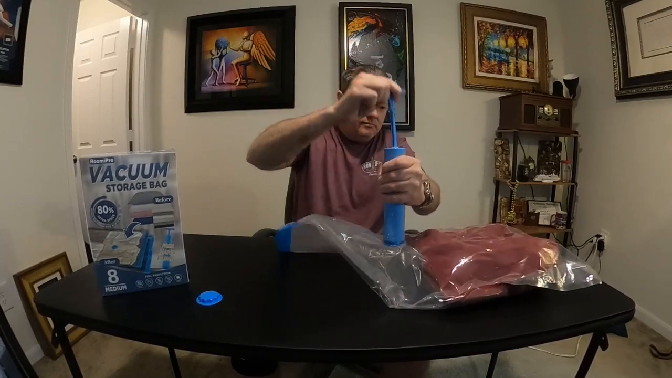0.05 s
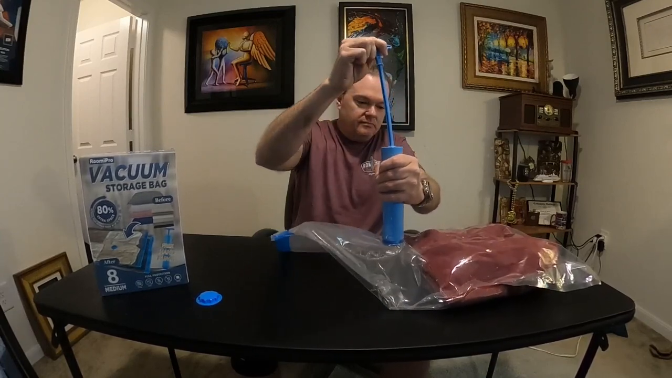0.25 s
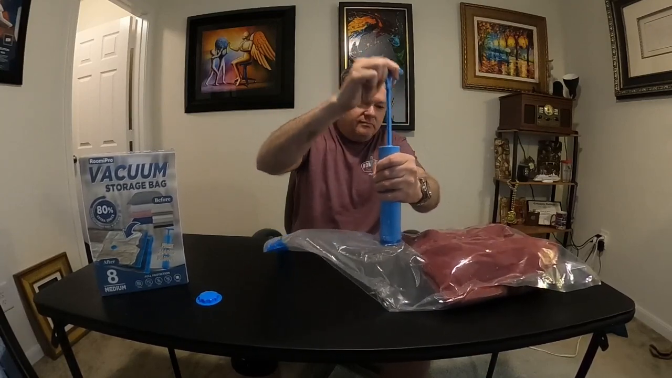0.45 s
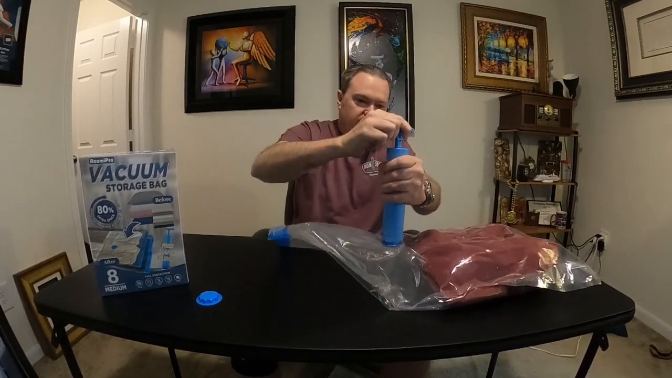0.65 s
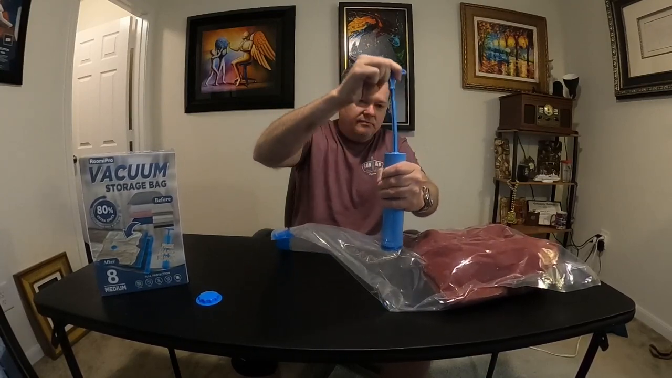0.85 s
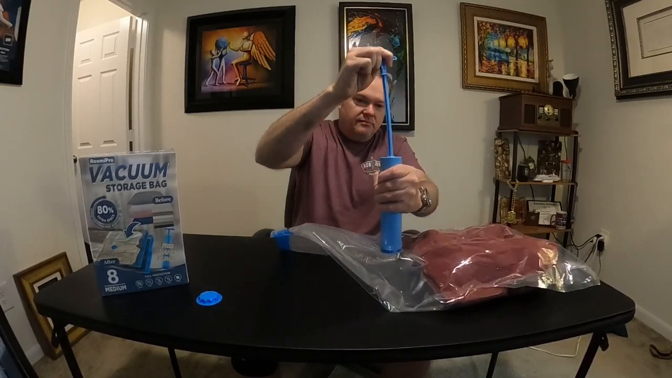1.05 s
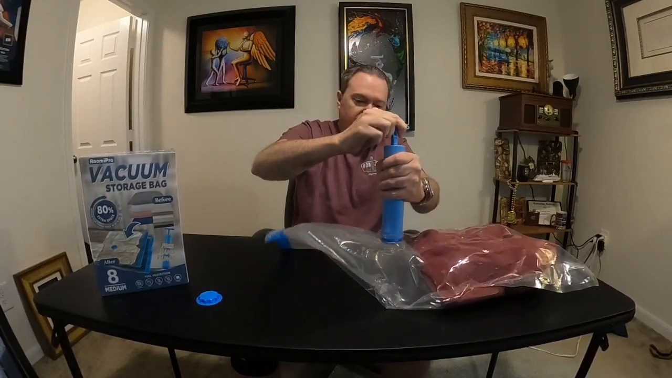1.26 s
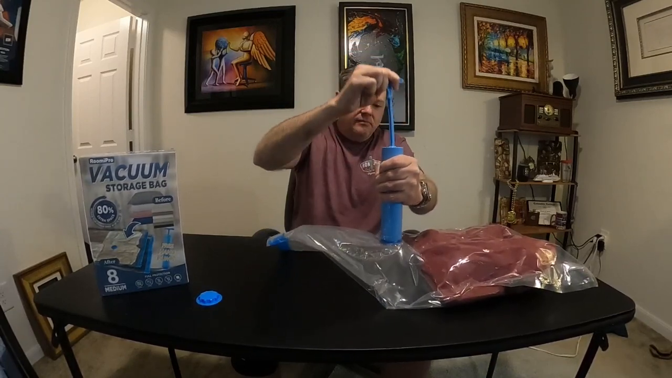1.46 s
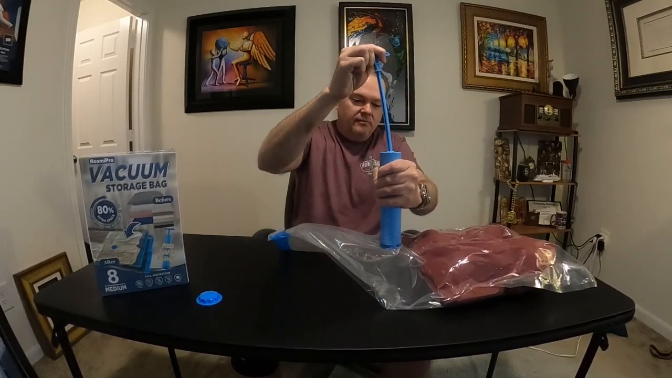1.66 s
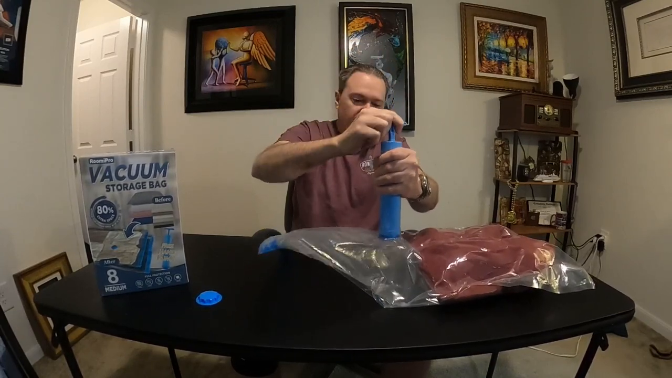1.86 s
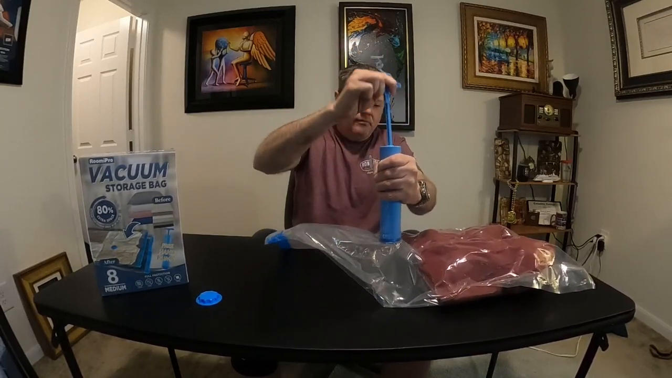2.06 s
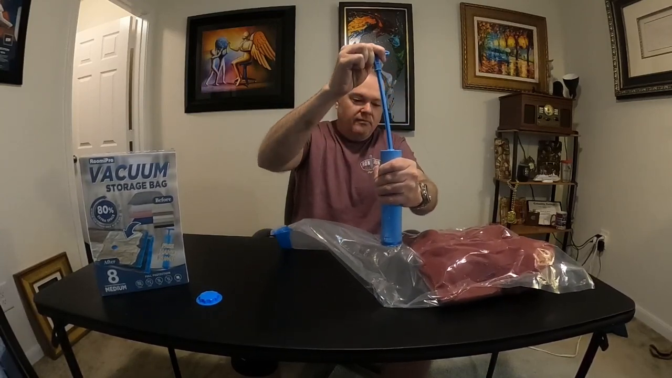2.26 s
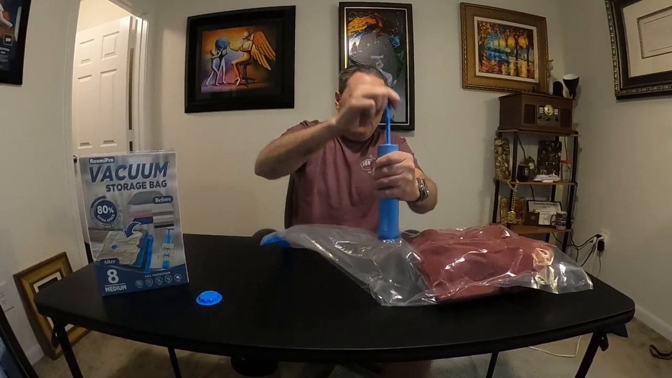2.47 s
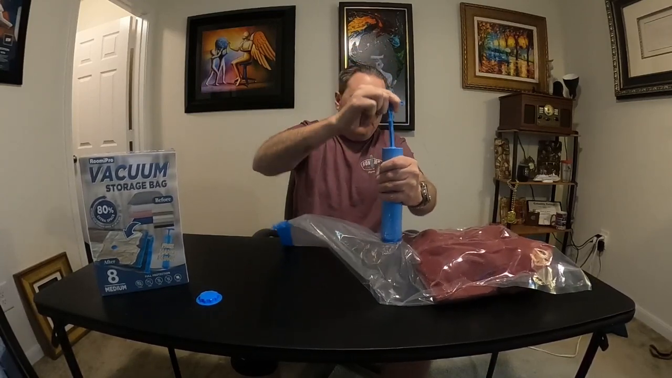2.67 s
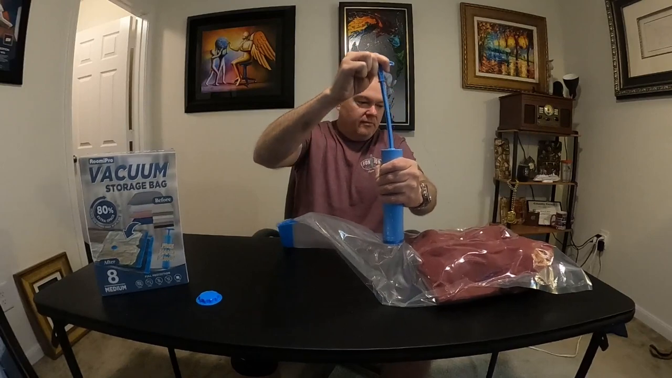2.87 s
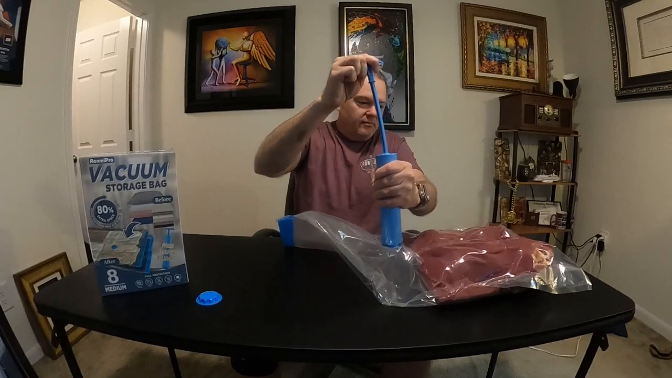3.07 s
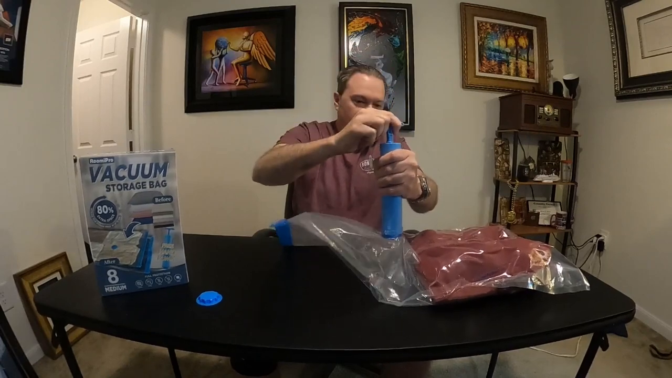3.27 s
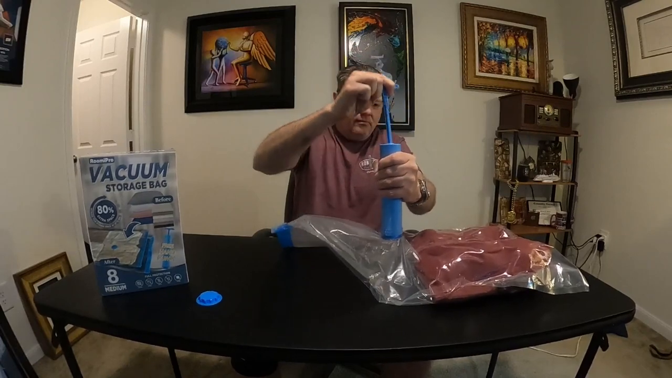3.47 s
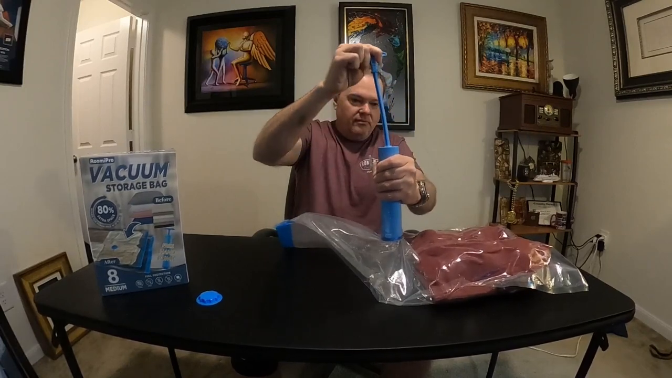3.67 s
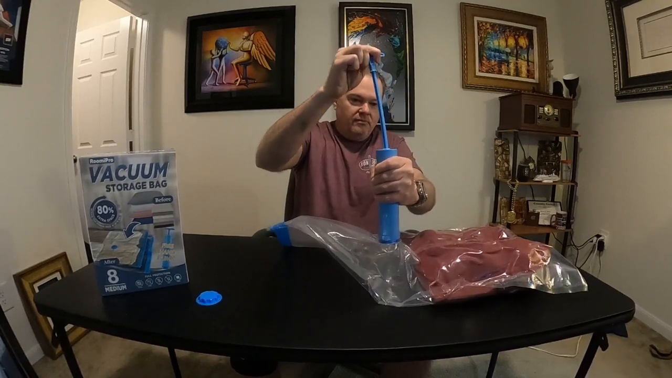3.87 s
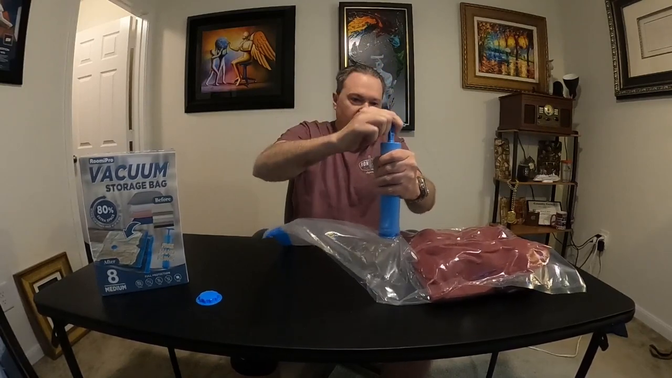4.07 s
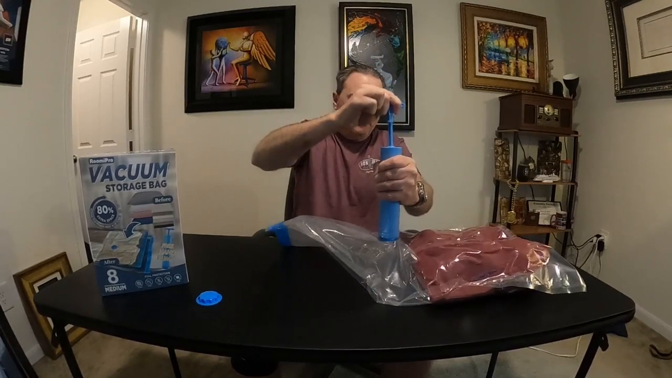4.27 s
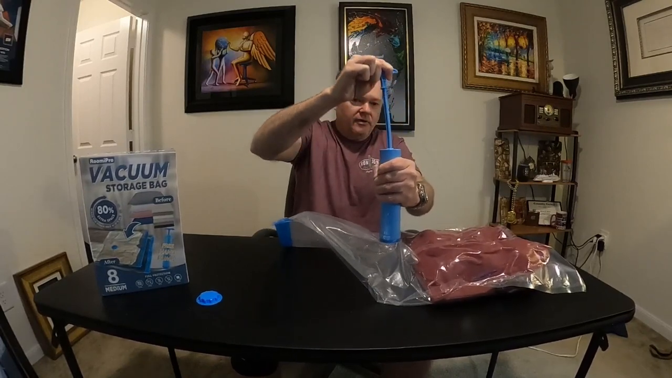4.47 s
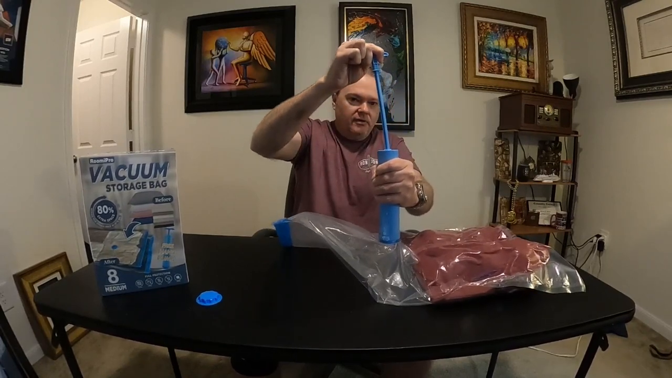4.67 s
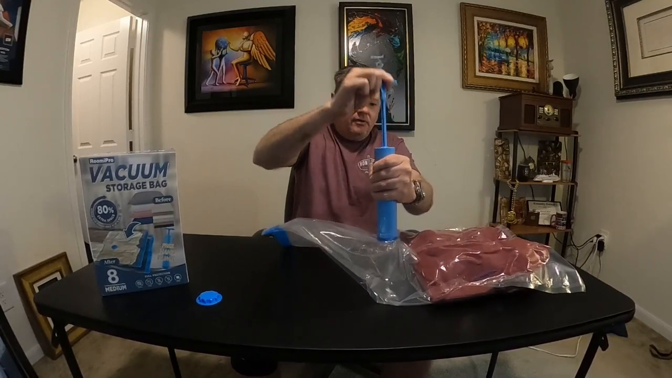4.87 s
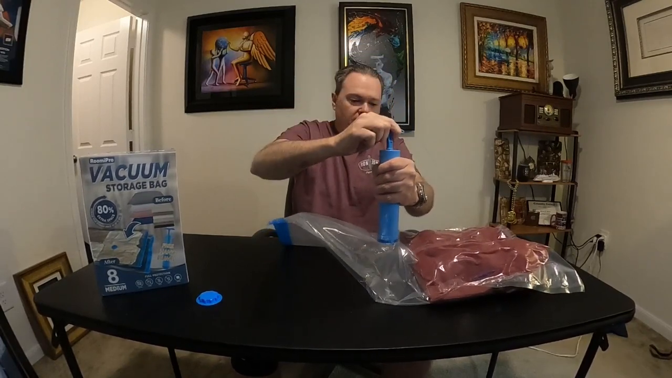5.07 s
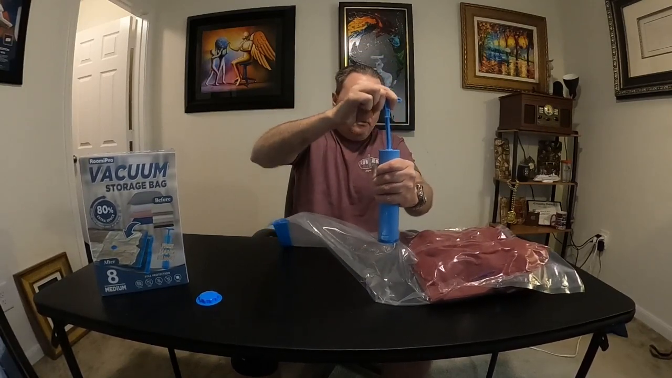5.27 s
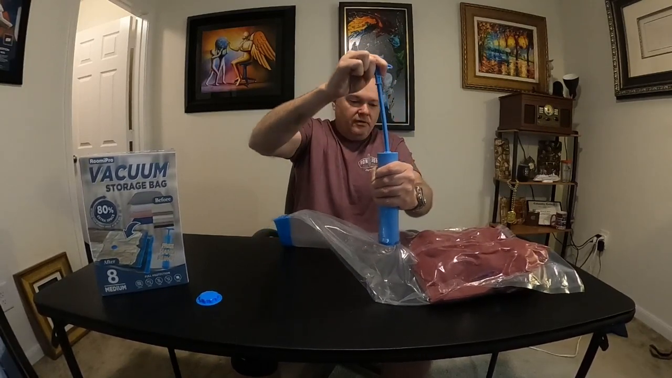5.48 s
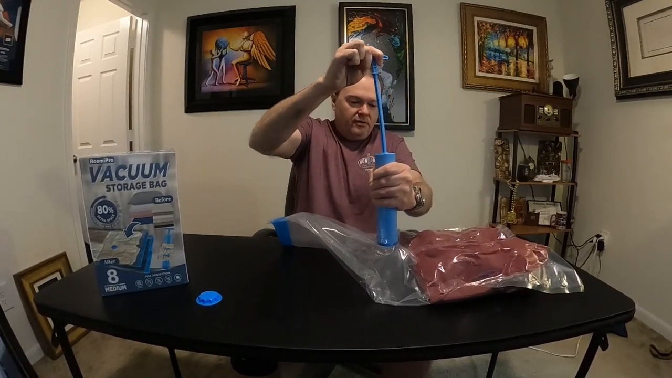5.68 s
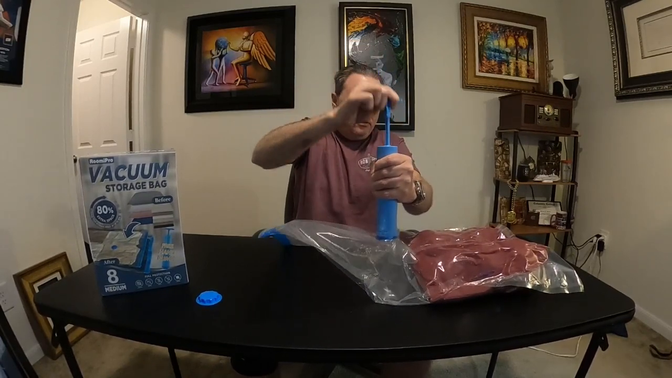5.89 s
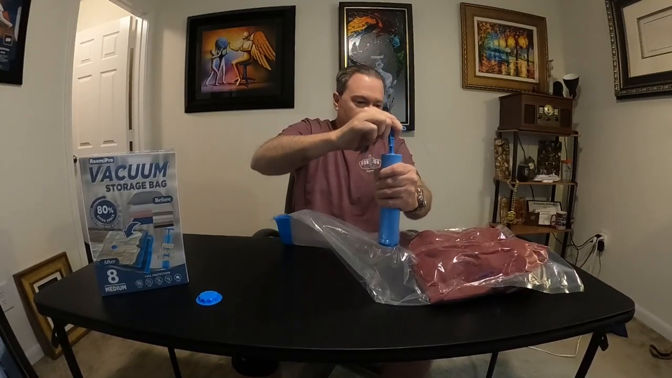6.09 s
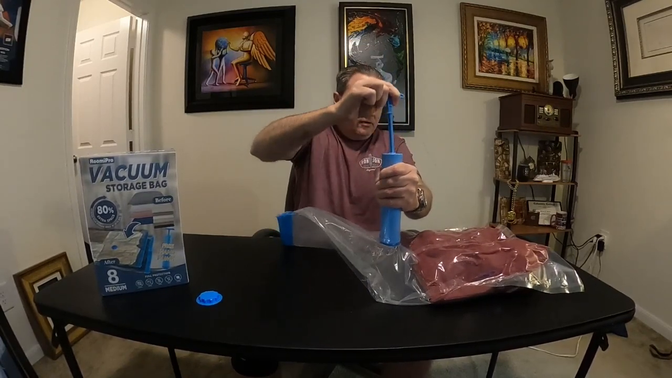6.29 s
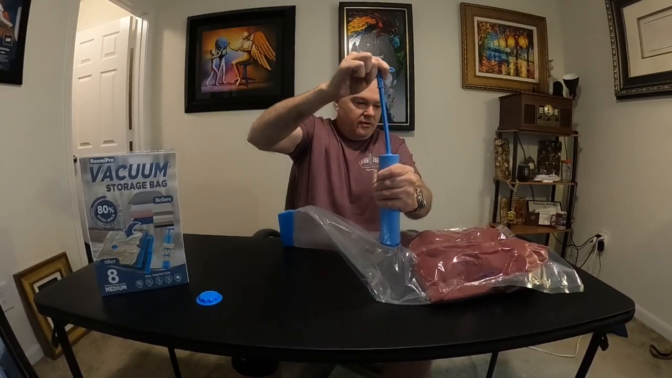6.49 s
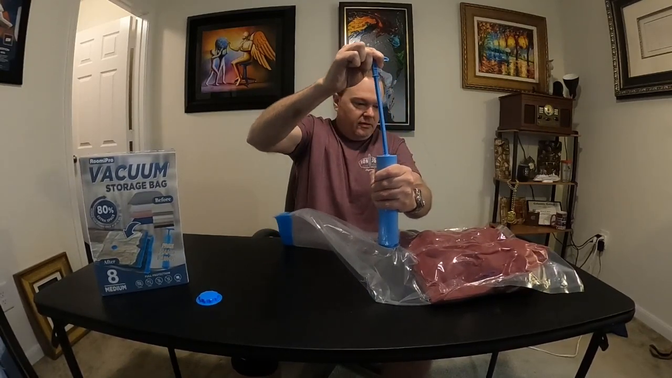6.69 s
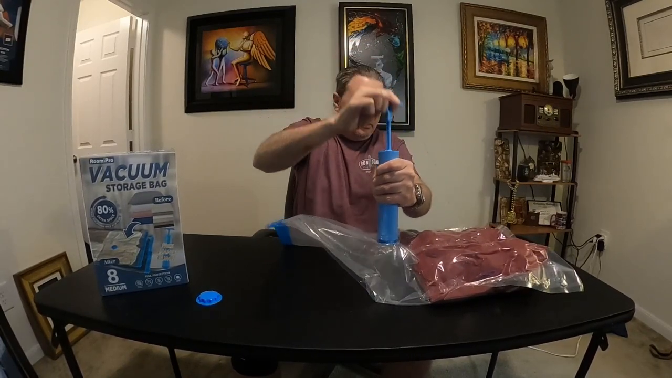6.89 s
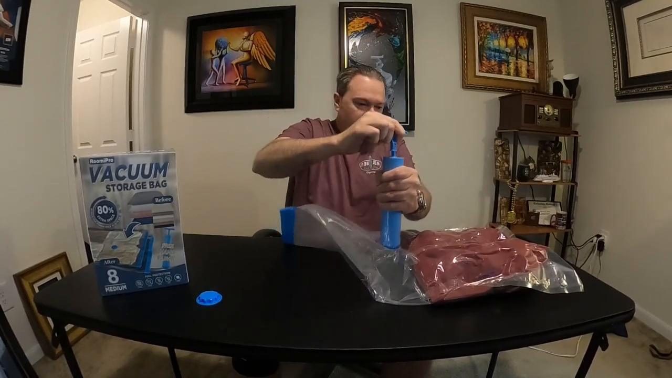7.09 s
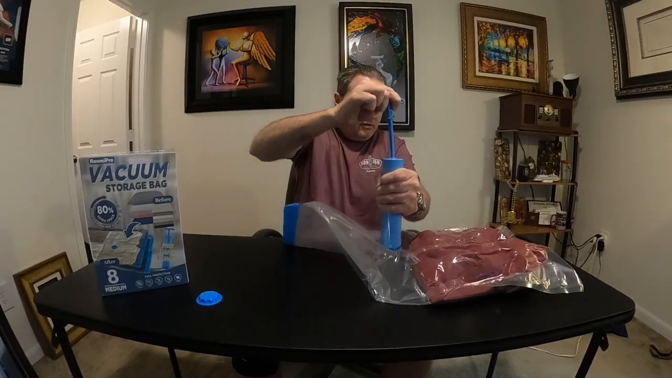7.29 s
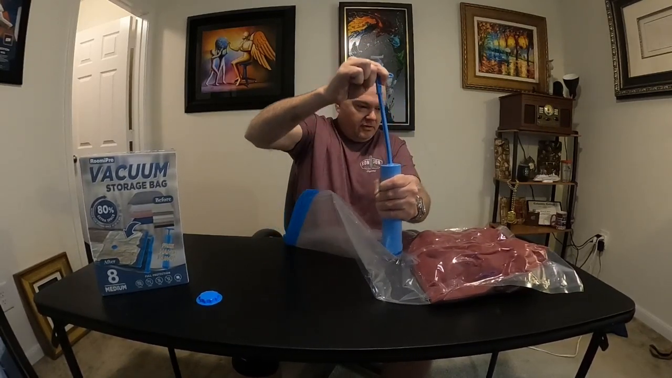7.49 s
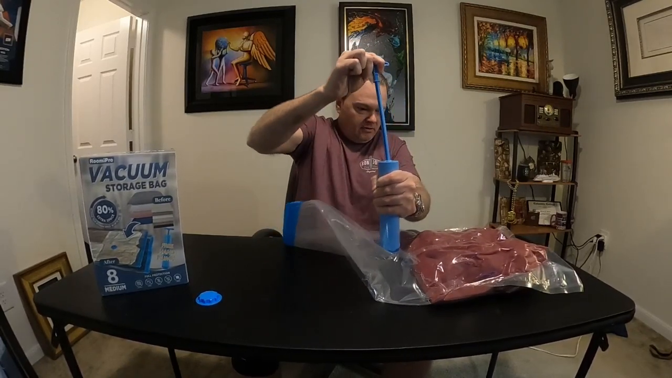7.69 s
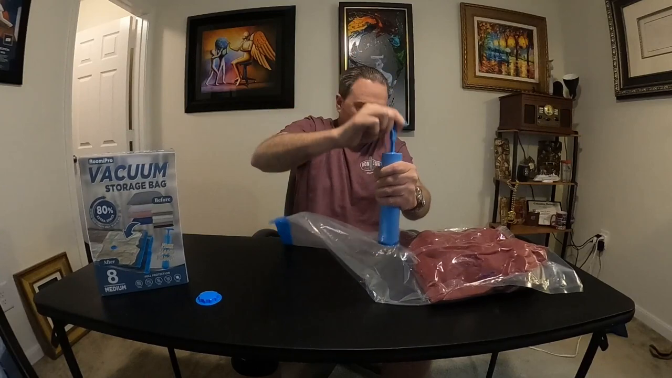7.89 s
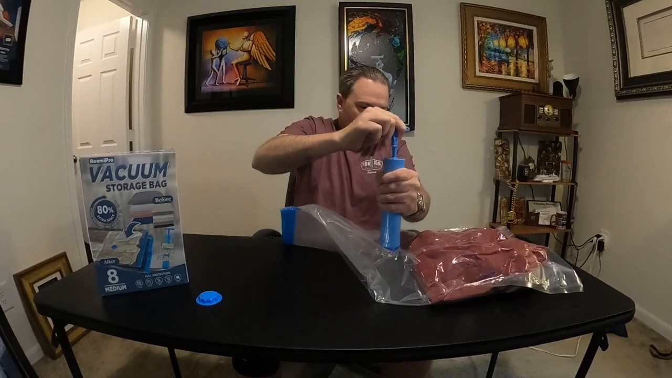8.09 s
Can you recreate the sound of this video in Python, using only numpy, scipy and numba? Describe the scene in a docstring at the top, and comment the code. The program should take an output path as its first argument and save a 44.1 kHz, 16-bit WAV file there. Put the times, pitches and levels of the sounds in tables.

```python
"""A whoosh breaking off in a knock comes first, over a low drone: a plastic hand pump empties a storage bag on
a table in a small, bare room. Pushes drive noise through a lengthening tube and end in impulsive knocks; pulls
hiss through the bag's valve as filtered noise, most ending in a hollow resonant plock. Filtered clicks make the
snaps of rod, film and valve, the creasing and some soft low thumps. Echoes and a dense decaying tail form the
room; a low, uneven sine sways the table."""
import sys
import numpy as np
from scipy import signal
from scipy.fft import rfft, irfft, next_fast_len
from scipy.io import wavfile
from numba import njit

SR = 44100
rng = np.random.default_rng(int(sys.argv[2]) if len(sys.argv) > 2 else 0)


def int16_out(signal):
    """Quantize to a 16-bit WAV file."""
    q = np.round(np.clip(np.atleast_2d(signal).T, -1, 1) * 32767)
    wavfile.write(sys.argv[1], SR, q.astype(np.int16))


N = 358974

# All levels in these tables are relative to one another; some sources also add an overall level.
# the piston goes down until its knock: start_s, rise_s (time to nearly full speed), level_db
PUSH_STROKES = [(-0.07, 0.051, -30), (0.51, 0.063, -34), (1.19, 0.077, -30), (1.82, 0.098, -27.5),
                (2.48, 0.094, -29), (3.184, 0.062, -29), (4.025, 0.039, -30.5), (4.915, 0.064, -31),
                (5.915, 0.057, -32), (6.9, 0.085, -30.5), (7.875, 0.09, -31)]
# the piston goes up: start_s, length_s, level_db, sag_db (loss of level by the end)
PULL_STROKES = [(0.101, 0.19, -33, 1), (0.811, 0.26, -29, 6), (1.471, 0.22, -32.5, 2),
                (2.083, 0.23, -32.5, 5), (2.704, .35, -36.5, 2), (3.46, 0.38, -35, 7),
                (4.277, 0.5, -39.5, 1.5), (5.203, .57, -39, 0.7), (6.188, 0.62, -37, 3.5),
                (7.184, 0.59, -36.5, 3)]
# the piston hits the bottom and presses the pump into the film:
# time_s, energy_db, tilt_db_per_octave, crease_db (level of the creasing)
BOTTOM_KNOCKS = [(0.0522, 6.5, 0, -41), (0.6898, 5, 2.5, -41), (1.3393, 5, -4.5, -37.5),
                 (1.97, 7, -1.7, -39.5), (2.64, 4, -2.5, -37.5), (3.323, 3.5, -8, -37),
                 (4.1818, 4, 3.5, -44.5), (5.0984, 2, 3.5, -40), (6.0727, 5, 0.5, -38.5),
                 (7.0719, 4.5, 0, -41.5), (8.0397, 3.5, 1, -40)]
# the piston reaches the top and the barrel's air rings: time_s, energy_db, pitch_hz
TOP_PLOCKS = [(0.3245, -0.5, 1614), (1.0641, -4, 1680), (1.742, -6, 1520), (2.3616, -7, 1630),
              (3.83, -3, 1680), (4.744, -17, 1660), (5.7018, -7, 1670), (6.7307, -9, 1650),
              (7.6851, -7.5, 1700)]
# snaps of the rod and the film, and of the valve opening as some pulls begin: # time_s, energy_db, ring_hz,
# tilt_db_per_octave
PLASTIC_SNAPS = [(0.391, -12, 2210, -7.5), (0.5612, -12, 3020, -5), (1.1577, -6.5, 1830, -2),
                 (1.4958, -6, 4000, -2), (1.8555, -8, 4000, 0), (2.0998, -6, 4000, -1),
                 (2.4671, -10, 1860, -5.5), (2.5749, -5.5, 2580, -9), (2.606, -6.5, 1397, -1),
                 (3.271, -2, 4670, -4), (3.2799, -5.5, 780, -0.5), (3.4859, -0.3, 2140, 0.5),
                 (3.9566, -8.5, 2000, 2), (4.409, -12.5, 700, 2), (4.605, -12, 1556, 1.5),
                 (4.846, -15.5, 1330, 0), (5.043, -6, 970, -3), (5.4272, -4, 1440, 1),
                 (5.8351, -7, 2570, -3), (5.8646, -10, 860, -18), (5.9776, -3.5, 2980, 6),
                 (6.162, -6.5, 920, 1), (6.3073, -3.5, 1960, 1.5), (6.554, 0.5, 3940, -8),
                 (7.172, -1.5, 5460, -5.5), (7.5256, -7.0, 3400, -3), (7.797, -10.5, 1360, -7),
                 (7.8389, -6, 1870, 0), (8.1284, -5.5, 1010, -1.5)]
# low, soft thumps: time_s, energy_db
LOW_THUMPS = [(0.099, -11), (0.712, -16), (0.796, -14), (1.452, -11), (2.694, -5.5), (3.161, -20),
              (3.456, -6), (3.601, -14), (4.891, -15), (5.807, -15.5), (6.162, -8.5), (7.189, -10.5)]
# the film creases as the pump leans over: time_s, level_db, spread_s (standard deviation)
FILM_CREASES = [(1.172, -40, .015), (2.421, -45.5, 0.053), (3.146, -42, 0.033), (3.553, -46, 0.085),
                (3.983, -39, 0.032), (4.885, -42.5, 0.019), (5.19, -45, .035), (5.706, -46.5, 0.021),
                (5.885, -43.5, 0.028), (6.888, -49, 0.018), (7.508, -49.5, .04)]
# the table sways under the weight of a push: time_s, level_db
TABLE_SWAYS = [(3.3, -51), (5.21, -45.5), (6.18, -46)]
# how tight the bag is, which sharpens the hiss: time_s, tightness (share 0-1)
BAG_TIGHTNESS = [(0, 0.08), (2.5, 0.2), (4.5, 1), (8.1, 0.98)]
# spectrum of the valve's hiss on a slack bag: frequency_hz, level_db
SLACK_HISS_SPECTRUM = [(150, -59), (500, -33), (1000, -9), (1800, -5), (2700, 0), (3500, 0.5), (4900, 3),
                       (6400, -1.5), (7700, -3), (8700, -19), (10000, -21), (11200, -36), (12300, -30),
                       (15000, -50)]
# spectrum of the valve's hiss on a tight bag: frequency_hz, level_db
TIGHT_HISS_SPECTRUM = [(150, -49), (500, -31), (1100, -53), (2000, -4.5), (2800, -7), (3600, -0.5),
                       (4900, 1.5), (6300, -2.5), (7700, -0.5), (8700, -14.5), (10100, -14), (11200, -23.5),
                       (12300, -20), (15000, -34)]
# spectrum of air rushing into the barrel: frequency_hz, level_db
WHOOSH_SPECTRUM = [(120, -32.5), (300, -14), (750, 1), (1100, -9.5), (1550, -5), (2700, -3.5), (3900, 1),
                   (4600, 5.5), (5800, 2.5), (6400, -5.5), (7700, -7), (8700, -24.5), (12300, -34),
                   (15000, -48)]
# spectrum of plastic touching plastic: frequency_hz, level_db
CONTACT_SPECTRUM = [(150, -47.5), (700, -0.5), (1400, -3.5), (5000, -2.5), (7700, -3), (8700, -20),
                    (11000, -32), (15000, -43)]
# spectrum of a knock's crack straight ahead: frequency_hz, level_db
CRACK_SPECTRUM = [(150, -47), (700, -27), (1100, -10.5), (1520, 6), (1850, -4.5), (2200, 3.5), (2800, -5),
                  (3500, 4), (4400, -4.5), (5300, 1.5), (6200, -4.5), (7300, 4), (8700, -17), (15000, -84)]
# spectrum of a dull blow: frequency_hz, level_db
THUD_SPECTRUM = [(40, -36), (150, -1.5), (280, 2), (440, -2), (700, -7.5), (1400, -32.5), (4000, -75)]
# spectrum of the rubbing and creasing film: frequency_hz, level_db
FILM_SPECTRUM = [(60, -18), (170, -0.5), (400, 0), (600, 2), (800, 3.5), (1150, -1), (1600, 2.5),
                 (2800, -7.5), (7500, -17), (10000, -39)]
# spectrum of the house's drone: frequency_hz, level_db
DRONE_SPECTRUM = [(20, -1.5), (45, 0), (65, 3), (82, -0.5), (105, -7), (170, -0.5), (300, -21.5),
                  (550, -31), (1500, -7.5), (7000, -33), (10000, -37), (15000, -73)]
# colour the walls give the room tail: frequency_hz, level_db
WALL_COLOUR = [(60, -2.5), (200, 2.5), (700, -7), (1100, -1), (1700, -4), (2700, -3), (3600, -0.5),
               (5000, -3), (7500, 1.5), (14000, 4)]
# left-right difference of the room tail: frequency_hz, side_db
TAIL_WIDTH = [(100, -20), (500, -12.5), (1100, -14.5), (2200, -9.5), (4500, -9.5), (8000, -10),
              (14000, 3.5)]
# decay of the room: frequency_hz, t60_s
ROOM_DECAY = [(150, 0.39), (600, 0.29), (1700, 0.38), (3600, 0.5), (8000, 0.35), (14000, 0.049)]
# first reflections: delay_s, gain
WALL_ECHOES = [(.0027, 0.14), (.0072, 0.045), (0.0107, 0.093), (0.0124, 0.081), (0.019, 0.065)]

EDGE_HZ = 15300  # upper edge of the sound's band
TAPS = 2048  # length of a click in samples
LEAD_S = .004  # from the start of a contact cluster to its centre
HZ = np.fft.rfftfreq(TAPS, 1 / SR)
TIME = np.arange(N) / SR
# a push eases off as the chamber fills: sag in dB per second of stroke left after the rise;
# its air dies away after the knock
PUSH_SAG_DB_PER_S, PUSH_RELEASE_S = 43, 0.038
# the valve opens at once on a slack bag and slowly on a tight one; the hiss dies as the hand stops
SLACK_ATTACK_S, TIGHT_ATTACK_S, PULL_RELEASE_S = 0.022, 0.054, 0.034
# the film creases most just after each knock: delay and standard deviation of that swell
PRESS_DELAY_S, PRESS_SPREAD_S = 0.021, 0.076


def amp(db):
    """Level as amplitude ratio: decibels to gain."""
    return 10 ** (np.asarray(db) / 20)


def evened(x):
    """Power normalisation: scales to rms 1."""
    return x / np.sqrt(np.mean(x ** 2) + 1e-20)


def unit(x):
    """Energy normalisation: scales to energy 1."""
    return x / (np.linalg.norm(x) + 1e-12)


def read(points, hz):
    """Interpolation of a spectrum along a log-frequency axis."""
    f, value = np.transpose(points)
    return np.interp(np.log(hz + 1), np.log(f + 1), value)


def add(mix, s, sound):
    """Superposition: mixes a sound in at time s, in seconds."""
    part = mix[max(round(s * SR), 0):][:len(sound)]
    part += sound[:len(part)]


def coloured(x, points):
    """Linear filtering: gives a long signal a spectrum, at rms 1."""
    size = next_fast_len(N)
    gain = amp(read(points, np.fft.rfftfreq(size, 1 / SR)))
    return evened(irfft(rfft(x, size) * gain)[:N])


def impulse(db):
    """Minimum phase: the causal click of energy 1 whose spectrum has the shape db."""
    log_gain = np.log(amp(np.r_[db, db[-2:0:-1]]))
    return unit(np.fft.ifft(np.exp(np.conj(signal.hilbert(log_gain)))).real)


def wander(hz):
    """Random modulation: straight lines between hz random values a second, at rms 1."""
    knots = rng.standard_normal(N // 20)
    return evened(np.interp(TIME * hz, np.arange(len(knots)), knots))


def grains(per_s, spread_db):
    """Shot noise: random clicks, a few much larger than the rest, at rms 1."""
    size = amp(spread_db * np.minimum(rng.exponential(1, N), 4))
    sign = rng.choice([-1, 1], N)
    return evened(size * sign * (rng.random(N) < per_s / SR))


def chatter(click, chatter_db, chatter_s):
    """Multiple impact: plastic meets plastic in a quick cluster centred LEAD_S after the start."""
    t = TIME[:round(2 * LEAD_S * SR)] - LEAD_S
    contacts = amp(chatter_db) * unit(rng.standard_normal(len(t)) * np.exp(-(t / chatter_s) ** 2))
    contacts[len(t) // 2] += 1  # the main contact
    return unit(signal.fftconvolve(contacts, click))


def resonance_db(hz, width_hz):
    """Simple resonator: gain of a single resonance, 0 dB at its peak."""
    return -10 * np.log10(1 + ((HZ ** 2 - hz ** 2) / ((HZ + 1) * width_hz)) ** 2)


def resonate(x, hz, width_hz):
    """Time-varying resonator: a resonance that follows the curve hz, at rms 1."""
    turn = np.exp(2j * np.pi * np.cumsum(hz) / SR)
    r = np.exp(-np.pi * width_hz / SR)
    # shift the moving centre down to 0 Hz, resonate there, shift back
    return evened((turn * signal.lfilter([1], [1, -2 * r, r * r], x / turn)).real)


@njit
def tube(x, delay, reflection):
    """Travelling waves: sound runs to and fro in a tube; delay is its changing round trip in samples."""
    y = x.copy()
    for i in range(400, len(x)):
        whole = int(delay[i])
        part = delay[i] - whole
        y[i] += reflection * ((1 - part) * y[i - whole] + part * y[i - whole - 1])
    return y


def ambience(level_db=-54, side_db=-17, hum_hz=82, hum_db=-61, swell_db=2):
    """Random noise: the low drone of the house, swelling slightly, with a hum wavering in pitch and level."""
    mid, side = (coloured(rng.standard_normal(N), DRONE_SPECTRUM) for _ in range(2))
    drone = mid + amp(side_db) * np.array([side, -side])
    hum = np.sqrt(2) * np.sin(2 * np.pi * hum_hz * TIME + .9 * wander(hz=9)) * amp(2 * wander(hz=8))
    return amp(level_db + swell_db * wander(hz=9.8)) * drone + amp(hum_db) * hum


def tail(colour, onset_s=0.0074):
    """Reverberation: one dense room tail in which each band dies at its own speed."""
    size = SR * 2 // 3
    taps = rng.standard_normal(size) * (rng.random(size) < .12)
    hz, t, z = signal.stft(taps, SR, nperseg=256)
    z = z * amp(read(WALL_COLOUR, hz)[:, None] - 60 * t / read(ROOM_DECAY, hz)[:, None])
    plain = signal.istft(z, SR, nperseg=256)[1]
    tinted = signal.istft(z * amp(read(colour, hz))[:, None], SR, nperseg=256)[1]
    swell = np.minimum(TIME[:len(plain)] / onset_s, 1) ** 2
    return swell * tinted / np.linalg.norm(swell * plain)


def room(direct, x, wet_db=-4, shift_per_s=9, count=5):
    """Reflection: direct sound, then echoes and a tail of x; both shift as arms and pump move."""
    mid = direct.copy()
    for delay_s, gain in WALL_ECHOES:
        path_s = delay_s + .00015 * wander(hz=3)
        mid += gain * np.interp(TIME - path_s, TIME, x)
    # the sound is passed round between several tails, each fading in and out
    for k in range(count):
        turn = (TIME * shift_per_s + k) % count
        fed = amp(wet_db) * x * np.sin(np.pi / 2 * np.minimum(turn, 2))
        mid += signal.oaconvolve(fed, tail([(0, 0), (SR, 0)]))[:N]
    # the left-right difference keeps one steady tail
    side = signal.oaconvolve(amp(wet_db) * x, tail(TAIL_WIDTH))[:N]
    return np.array([mid + side, mid - side])


def sways(hz=30, spread_s=0.047):
    """Forced vibration: a few low, uneven swings of the table top."""
    gain = sum(amp(db) * np.exp(-((TIME - s) / spread_s) ** 2 / 2) for s, db in TABLE_SWAYS)
    uneven_hz = hz * (1 + 0.277 * wander(hz=40))
    return gain * np.sqrt(2) * np.sin(2 * np.pi * np.cumsum(uneven_hz) / SR)


def bumps(pitch=1.05):
    """Soft impact: low, soft thumps."""
    out, thud = np.zeros(N), impulse(read(THUD_SPECTRUM, HZ / pitch))
    for s, db in LOW_THUMPS:
        add(out, s, amp(db) * thud)
    return out


def snaps(width_hz=500, ring_db=11, body_db=-17, body_hz=760, body_t60_s=0.12):
    """Buckling: thin plastic ticks with one short ring, and the bag's stiff skin hums on briefly."""
    out, t = np.zeros(N), TIME[:SR // 5]
    for s, db, hz, tilt in PLASTIC_SNAPS:
        ring = 20 * np.log10(1 + amp(ring_db + resonance_db(hz, width_hz)))
        slope = tilt * np.log2(np.clip(HZ, 1200, 8000) / 3000)
        click = impulse(read(CONTACT_SPECTRUM, HZ) + ring + slope)
        add(out, s - LEAD_S, amp(db) * chatter(click, chatter_db=-4, chatter_s=.001))
        modes_hz = body_hz * rng.uniform(.85, 1.1, size=(4, 1))
        skin = np.sin(2 * np.pi * modes_hz * t).sum(0)
        add(out, s, amp(body_db) * unit(skin * amp(-60 * t / body_t60_s)))
    return out


def handling(flow, rub_db=-58, swell_db=3, rest_db=-14):
    """Friction: hand and rod rub dully, mostly as the piston moves, and the film creases in bursts."""
    moving = evened(np.sqrt(flow)) + amp(rest_db)
    gain = amp(rub_db + swell_db * wander(hz=12)) * moving
    presses = [(s + PRESS_DELAY_S, db, PRESS_SPREAD_S) for s, _, _, db in BOTTOM_KNOCKS]
    for s, db, spread_s in presses + list(FILM_CREASES):
        burst = np.exp(-np.minimum(((TIME - s) / spread_s) ** 2 / 2, 20))
        gain = np.hypot(gain, amp(db) * burst)
    return gain * coloured(grains(per_s=700, spread_db=3.0), FILM_SPECTRUM)


def seal(flow, level_db=-56, swell_db=4, centre_hz=1780, spread_hz=420):
    """Sliding friction: the seal rubs in the barrel, soft and hollow, and comes and goes."""
    peak = [(centre_hz - spread_hz, -10), (centre_hz, 0), (centre_hz + spread_hz, -6)]
    hollow = [(500, -35), *peak, (3200, -22), (9000, -50)]
    rub = coloured(rng.standard_normal(N), hollow)
    return rub * amp(level_db + swell_db * wander(hz=16)) * evened(flow ** 0.61)


def barrel(down, up, bottom_hz=1100, top_hz=2400, rise_share=0.537, fall_s=0.152, width_hz=380,
           push_db=-14, pull_db=-56, fade_db=30):
    """Air-column resonance: the lowest note climbs on pulls, fading near the top, and sinks on pushes."""
    climb = np.zeros(N)
    for start, length, *_ in PULL_STROKES:
        risen = np.clip((TIME - start) / (rise_share * length), 0, 10)
        climb = np.where(TIME >= start, risen, climb)
    bottoms = np.array(BOTTOM_KNOCKS)[:, 0]
    index = np.minimum(np.searchsorted(bottoms + fall_s, TIME), len(bottoms) - 1)
    time_left = bottoms[index] - TIME

    def note(height):
        """Resonant pitch: noise rings higher as the piston stands higher (0-1)."""
        hz = bottom_hz * (top_hz / bottom_hz) ** np.clip(height, 0, 1)
        return resonate(rng.standard_normal(N), hz, width_hz)

    drive = evened(np.sqrt(up)) * amp(-fade_db * np.maximum(climb - 1, 0))
    return amp(pull_db) * drive * note(climb) + amp(push_db) * down * note(time_left / fall_s)


def plocks(width_hz=400, thud_db=-10, thud_delay_s=0.001, gasp_db=-12, gasp_s=0.01):
    """Air-column release: at the top the seal lets air slip past for a moment, and the barrel pops."""
    out, t = np.zeros(N), TIME[:SR // 5] - .1
    thud = impulse(read(THUD_SPECTRUM, HZ * 1.43))  # lower than a knock's thud
    for s, db, hz in TOP_PLOCKS:
        pop = impulse(2 * resonance_db(hz, width_hz).clip(-14) + read(CONTACT_SPECTRUM, HZ))
        add(out, s, amp(db) * pop)
        # the gasp of air swells before the pop and dies after it
        gasp = signal.fftconvolve(rng.standard_normal(len(t)) * np.exp(-abs(t) / gasp_s), pop)
        add(out, s + t[0], amp(gasp_db) * unit(gasp))
        add(out, s + thud_delay_s, amp(db + thud_db) * thud)
    return out


def knocks(thud_db=-9, thud_delay_s=0.0023, ring_db=-9, ring_t60_s=0.21, ring_hz=3500,
           ring_width_hz=400, damping_db=-4, around_db=-2, around_tilt=0.61):
    """Impact: a crack, a thud through the foot and a thin after-ring that is weaker on a tight bag.
    Returns what goes straight ahead and what spreads into the room."""
    ahead, around, body = np.zeros(N), np.zeros(N), np.zeros(N)
    t = TIME[:SR // 2]
    band = 1 / (1 + ((np.fft.rfftfreq(SR, 1 / SR) - ring_hz) / ring_width_hz) ** 4)
    for s, db, tilt, _ in BOTTOM_KNOCKS:
        slope = tilt * np.log2(np.clip(HZ, 1200, 7000) / 3000)
        click = impulse(read(CRACK_SPECTRUM, HZ) + slope)
        add(ahead, s - LEAD_S, amp(db) * chatter(click, chatter_db=0, chatter_s=.0007))
        # summed over all directions, the crack's peaks and dips even out
        diffuse = impulse(read(CONTACT_SPECTRUM, HZ) + around_tilt * slope)
        add(around, s, amp(db + around_db) * diffuse)
        add(body, s + thud_delay_s, amp(db + thud_db) * impulse(read(THUD_SPECTRUM, HZ)))
        ring = irfft(rfft(rng.standard_normal(SR)) * band)[:len(t)] * amp(-60 * t / ring_t60_s)
        damped_db = damping_db * np.interp(s, *np.transpose(BAG_TIGHTNESS))
        add(body, s, amp(db + ring_db + damped_db) * unit(ring))
    return ahead + body, around + body


def stroke(start, end, attack, sag_db, release, steepness=5.8):
    """Flow envelope: the air gathers speed, sags until the piston stops, then dies away."""
    rise = .5 + .5 * np.tanh(steepness / 2 * ((TIME - start) / attack - .5))
    done = np.clip((TIME - start) / (end - start), 0, 1)
    return rise * amp(-sag_db * done) * np.exp(-np.clip((TIME - end) / release, 0, 20))


def pull_flow():
    """Suction flow of all the pulls; it starts more slowly as the bag tightens."""
    gain = np.zeros(N)
    for start, length, db, sag_db in PULL_STROKES:
        tight = np.interp(start, *np.transpose(BAG_TIGHTNESS))
        attack = np.interp(tight, [0, 1], [SLACK_ATTACK_S, TIGHT_ATTACK_S])
        gain += amp(db) * stroke(start, start + length, attack, sag_db, PULL_RELEASE_S)
    return gain


def pull(flow, flutter_db=1.5, level_db=-2, crinkle_db=-17, long_trip_s=0.00131,
         short_trip_s=0.000473, reflection=0.092):
    """Jet noise: air is sucked through the valve; the shrinking chamber's resonances rise."""
    tight = np.clip(np.interp(TIME, *np.transpose(BAG_TIGHTNESS)), 0, 1)
    ends = np.ravel([(start, start + length) for start, length, *_ in PULL_STROKES])
    trip_s = np.interp(TIME, ends, np.tile([long_trip_s, short_trip_s], len(PULL_STROKES)))
    slack_jet, tight_jet = (coloured(tube(rng.standard_normal(N), trip_s * SR, reflection), shape)
                            for shape in (SLACK_HISS_SPECTRUM, TIGHT_HISS_SPECTRUM))
    jet = np.sqrt(1 - tight) * slack_jet + np.sqrt(tight) * tight_jet
    jet = jet * amp(flutter_db * wander(hz=49.8))
    crinkle = amp(crinkle_db) * coloured(grains(per_s=83, spread_db=11), CONTACT_SPECTRUM)  # of the film
    return amp(level_db) * (jet + crinkle) * flow


def push_flow():
    """Inflow of all the pushes; each dies away from its knock on."""
    gain = np.zeros(N)
    for (start, rise, db), (end, *_) in zip(PUSH_STROKES, BOTTOM_KNOCKS):
        sag_db = PUSH_SAG_DB_PER_S * (end - start - rise)
        gain += amp(db) * stroke(start, end, rise, sag_db, PUSH_RELEASE_S)
    return gain


def push(flow, short_trip_s=0.00043, long_trip_s=0.00111, travel_s=0.185, reflection=0.34,
         scrape_db=-9, flutter_db=1, level_db=-1):
    """Flow noise in a tube: air fills the lengthening chamber above the piston; its resonances fall."""
    bottoms = np.array(BOTTOM_KNOCKS)[:, 0]
    index = np.minimum(np.searchsorted(bottoms + 0.062, TIME), len(bottoms) - 1)
    trip_s = np.interp(bottoms[index] - TIME, [0, travel_s], [long_trip_s, short_trip_s])
    air = rng.standard_normal(N) + amp(scrape_db) * grains(per_s=260, spread_db=11.5)
    air = tube(air, trip_s * SR, reflection)
    return coloured(air, WHOOSH_SPECTRUM) * flow * amp(level_db + flutter_db * wander(hz=88.3))


def scene():
    """Superposition of sources: the pump and the bag, straight ahead in the room."""
    down, up = push_flow(), pull_flow()
    rubbing = handling(down + up) + seal(down + up)
    air = barrel(down, up) + pull(up) + push(down)
    pump = bumps() + snaps() + rubbing + plocks() + air
    knock_ahead, knock_around = knocks()
    return ambience() + sways() + room(pump + knock_ahead, pump + knock_around)


def record(dry):
    """Band limitation: a low-pass filter takes away what lies above EDGE_HZ."""
    low_pass = signal.firwin(255, EDGE_HZ, window=("kaiser", 9), fs=SR)
    return signal.oaconvolve(dry, low_pass[None], "same")


dry = scene()
out = record(dry)
int16_out(out)
```